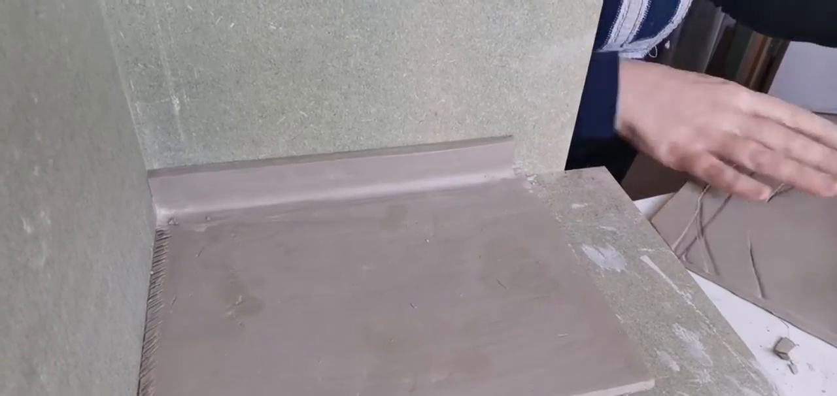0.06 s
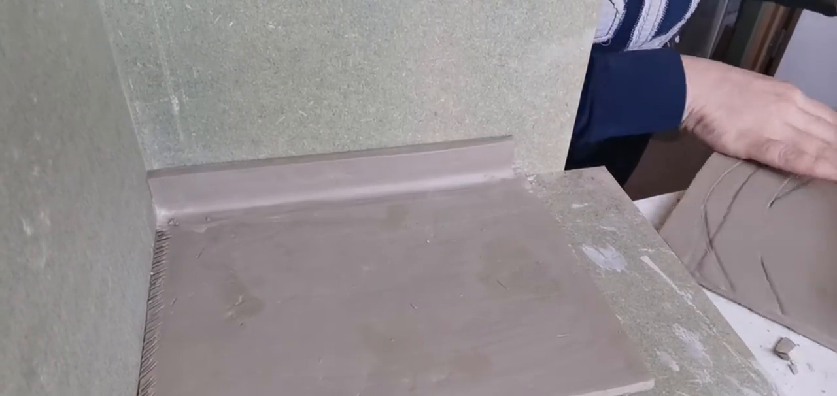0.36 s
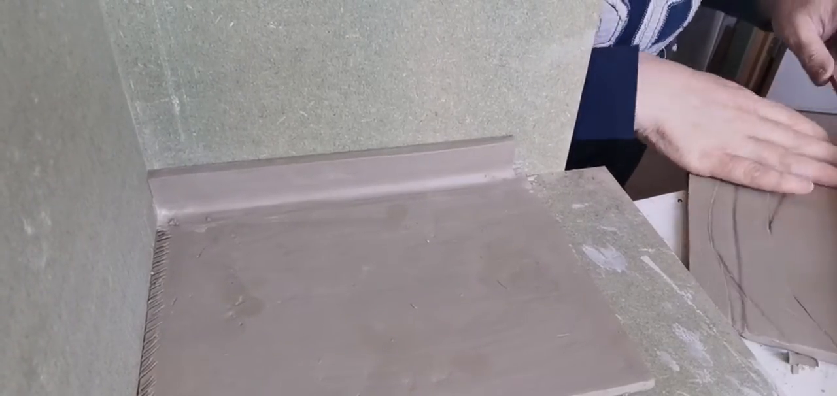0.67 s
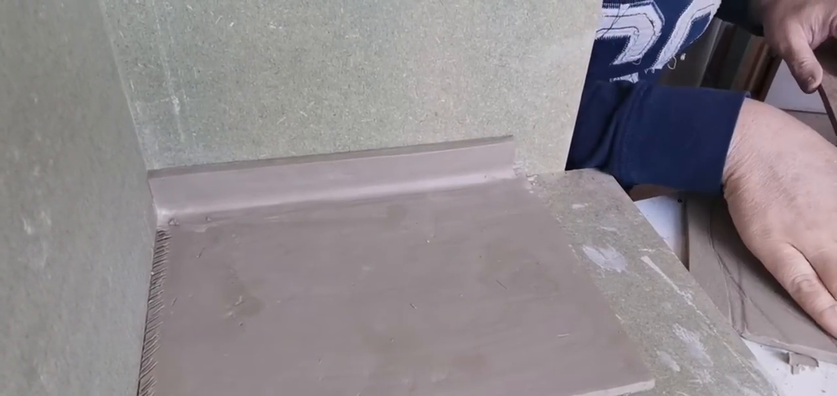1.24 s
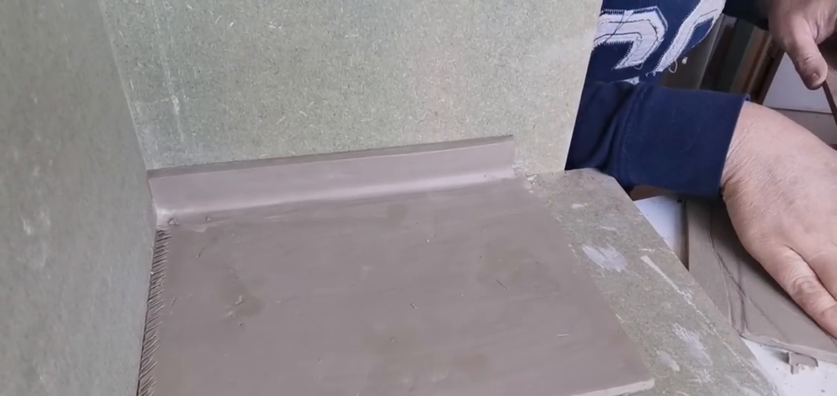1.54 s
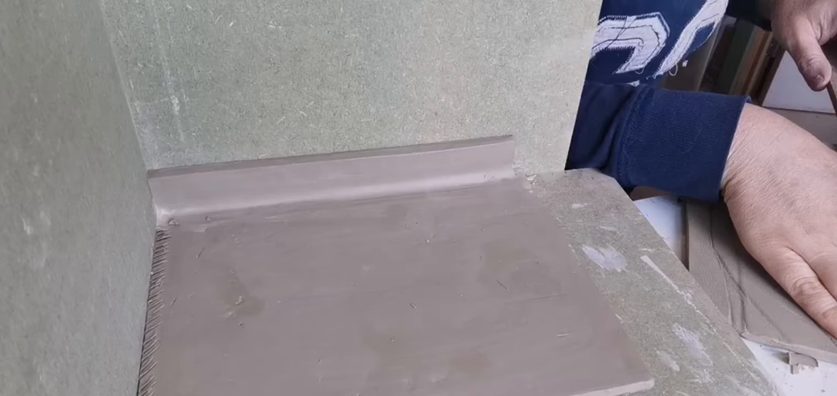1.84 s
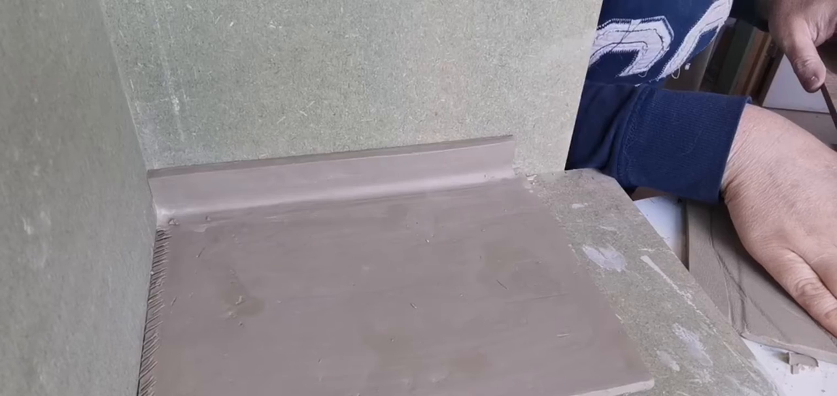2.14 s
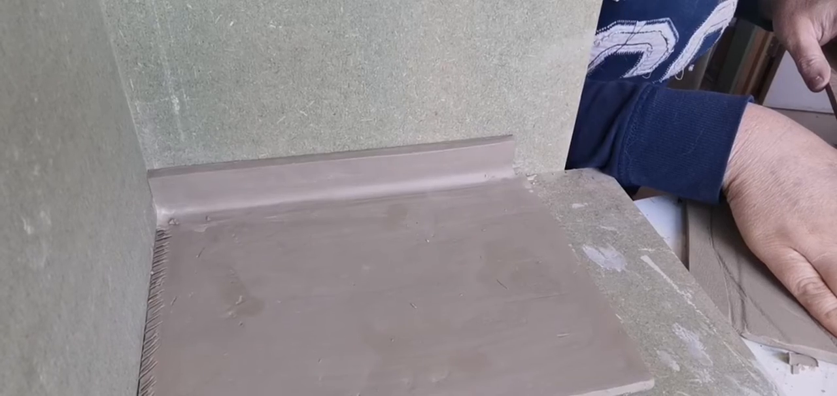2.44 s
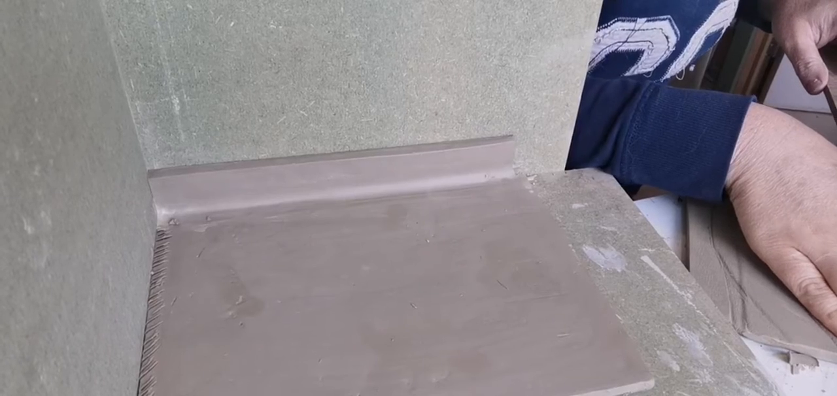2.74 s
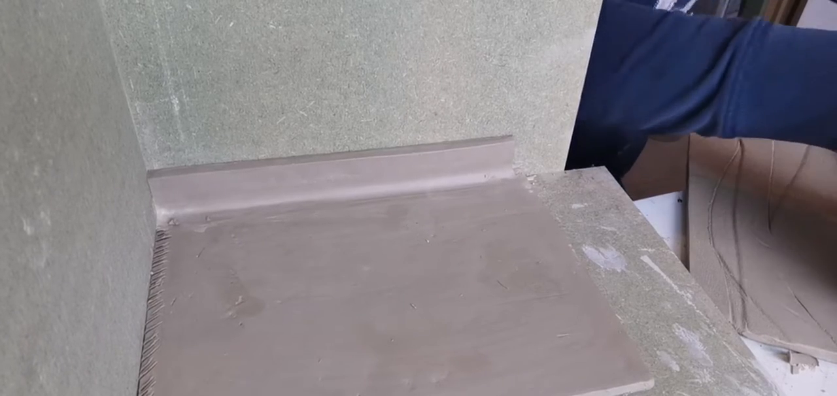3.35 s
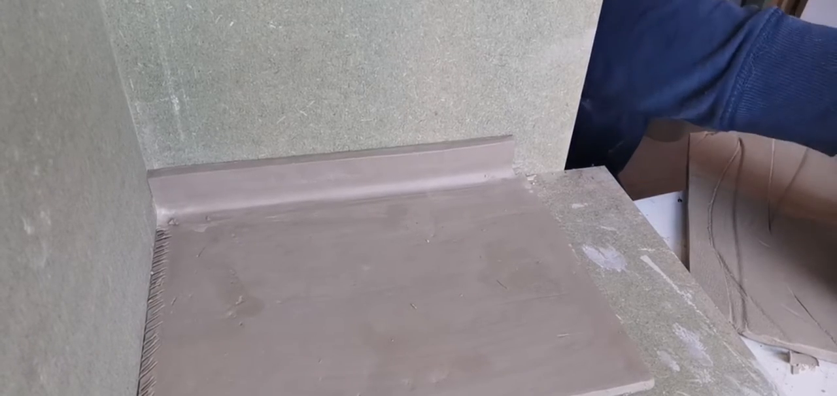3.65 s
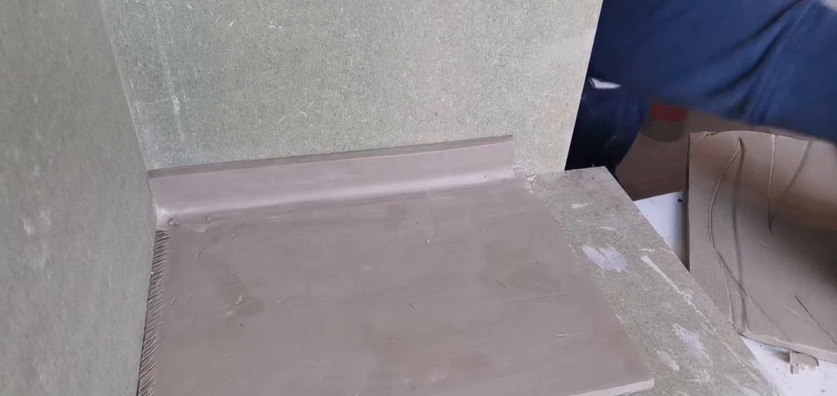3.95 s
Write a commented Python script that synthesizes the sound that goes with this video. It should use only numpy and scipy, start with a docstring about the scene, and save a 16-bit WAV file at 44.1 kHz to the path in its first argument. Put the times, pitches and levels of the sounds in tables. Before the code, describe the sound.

A hand rubs and shifts a clay slab, with soft knocks on a work board.

```python
"""A quiet workroom, where hands shift a clay slab about on a work board.
Impacts of the slab excite the board's modes; sliding friction makes the scuffs and the hiss of a palm
sweeping the clay. Something drags faintly in the lull, then a sleeve rustles, and things are put down
with a thud, a gritty click and a short scrape, all over the low rumble and hiss of the room."""
import sys
import numpy as np
from scipy import signal
from scipy.fft import rfft, irfft
from scipy.io import wavfile
from scipy.ndimage import uniform_filter1d

SR = 44100
rng = np.random.default_rng(int(sys.argv[2]) if len(sys.argv) > 2 else 0)


def materialize(psi):
    """Save the field psi as 16-bit PCM at rate SR to the path in sys.argv[1].

    A 1-D psi becomes a single channel; in a 2-D psi each row is a channel.
    """
    bounded = np.clip(np.atleast_2d(psi).T, -1, 1)
    quanta = np.round(bounded * 32767).astype(np.int16)
    wavfile.write(sys.argv[1], SR, quanta)


N = 176400
T = np.arange(N) / SR

# Rumble and hiss of the room. Each row: frequency in Hz, relative level in dB.
ROOM_SPECTRUM = [(12, -45), (20, 6.5), (38, 0), (81, -8.5), (113, -2.5), (215, -15.5), (335, -17.5),
                 (554, -22), (797, -23.5), (1080, -25.5), (1320, -26.5), (2960, -30.5), (3310, -34),
                 (4630, -28), (5950, -35), (8090, -34.5), (9830, -43), (13700, -35.5), (15800, -33.5)]
# Likeness of the two ears' signals. Each row: frequency in Hz, correlation.
COHERENCE = [(30, 0.21), (130, 0.89), (300, 0.62), (640, 0.12), (1400, -0.16), (4000, -0.023),
             (15000, 0.02)]
# Dull drags over the board. Each row: peak time in seconds, level in dB, rise and fall time constants
# in seconds, centre frequency and bandwidth in Hz.
DRAG_STROKES = [(.03, -38, 0.071, 0.11, 29.6, 30), (.008, -37, 0.043, 0.017, 106, 84),
                (.3, -57, 0.43, 0.37, 264, 137), (.75, -50, 0.13, 0.036, 142, 65),
                (.85, -52.5, 0.27, 0.069, 28.2, 21), (1.235, -48, 0.023, 0.1, 52.6, 100),
                (1.407, -43.5, 0.021, 0.021, 165, 35), (2.15, -62, 0.24, 0.45, 338, 54),
                (3.241, -52, 0.06, 0.18, 133, 85), (3.349, -49.5, 0.053, 0.046, 366, 250),
                (3.78, -44.5, 0.1, 0.15, 150, 167)]

# Envelopes of the sleeve and of the palm's low rub and top sheen.
# Each row: time in seconds, relative level in dB.
SLEEVE_ENVELOPE = [(2.75, -82), (2.768, -96), (2.78, -69), (2.912, -56.5), (2.982, -56), (3.06, -63),
                   (3.16, -49.5), (3.354, -50.5), (3.38, -56), (3.504, -55), (3.56, -65)]
RUB_ENVELOPE = [(0.38, -73), (0.398, -65.5), (0.482, -56), (0.674, -69), (0.762, -62.5), (0.786, -51),
                (0.872, -57.5), (0.928, -51.5), (1.05, -92)]
SHEEN_ENVELOPE = [(0.23, -69), (0.252, -62.5), (0.386, -65.5), (0.48, -50.5), (0.7, -67), (0.744, -66),
                  (0.798, -44.5), (0.9, -46.5), (0.932, -40.5), (1.034, -76), (1.108, -82), (1.192, -67),
                  (1.3, -82)]
# The palm's main hiss. Each row: time in seconds, relative level in dB, relative leftward balance in dB.
PALM_PATH = [(0.2, -59.5, -4), (0.246, -59, -4), (0.255, -48.5, -6), (0.296, -57, -2.5), (0.332, -53, -10),
             (0.372, -59, -8.5), (0.472, -40.5, -2), (0.668, -56.5, -2), (0.759, -54.5, -6.5),
             (0.785, -33.5, -5), (0.81, -33, -0.5), (0.845, -38, 0), (0.885, -39, -0.5), (0.926, -31, 1),
             (1.056, -70.5, 1), (1.1, -71, -2.0)]
# Spectra of the friction noises and the grit's crack. Each row: frequency in Hz, relative level in dB.
SLEEVE_SPECTRUM = [(290, -18), (500, -7.5), (586, -39), (630, -11.5), (931, -6.5), (1060, -9.5),
                   (1630, -16.5), (3040, -7), (3570, -13), (4900, 1.5), (5500, -9), (8130, -2.5),
                   (11500, -15.5), (13100, -8.5), (15800, -16.5)]
RUB_SPECTRUM = [(350, -36), (700, -16), (1150, -5.5), (1450, -10.5), (1800, -8), (2400, -7), (2900, -1),
                (3600, -31), (5000, -46)]
PALM_SPECTRUM = [(2200, -28.5), (3200, -6.5), (3700, -3.5), (4200, -1.5), (4900, 4), (5900, -7.5),
                 (7000, -2), (7900, 2), (9200, -6), (10500, -31), (13000, -40)]
SHEEN_SPECTRUM = [(7500, -26), (9800, 1.5), (11000, -2.5), (12200, -2), (13300, 3), (14500, -1.5),
                  (16000, -3)]
SCUFF_SPECTRUM = [(200, -1.5), (700, 3.5), (1100, -6), (1800, -2.5), (2500, -2), (3500, -3), (5000, -2),
                  (6200, -1), (8200, 2), (11000, -8), (13500, -6.5), (16000, -15)]
CRACK_SPECTRUM = [(1000, -20), (2800, 1), (4500, 5), (6000, 4.5), (8200, 4.5), (10500, -10.5), (13500, -15),
                  (16000, -9)]
# Balance of palm and sleeve, then of scuffs and cracks. Each row: frequency in Hz, left over right in dB.
ARM_BALANCE = [(1000, 6.5), (3600, -3.5), (4900, -7), (5900, 3), (7900, -6.5), (9300, -0.5), (10800, 27),
               (13300, 1), (16000, 21)]
SLAB_BALANCE = [(1000, 2.5), (3600, -1.5), (4900, -10), (5900, -1), (8000, -8), (9300, 3), (10800, 13),
                (13300, 1.5), (16000, 22)]

# Skids of the slab, plus two rows at 0.81 s and 0.927 s that give the palm's sweep extra bite and grit. # Each
# row: peak time in seconds, level in dB, rise and fall time constants in seconds, # relative rasp level in dB,
# rasp frequency and bandwidth in Hz, rasp's left over right in dB.
SKIDS = [(0.069, -51, 0.011, 0.0092, 6.5, 4730, 260, -13), (0.107, -51, 0.0067, 0.014, 16, 4590, 335, -18),
         (0.156, -45, 0.035, 0.014, 4, 4870, 340, -15), (0.175, -62.5, 0.011, 0.0066, 11, 3060, 200, 11),
         (.81, -54.5, 0.011, 0.017, 21, 7200, 1500, -5), (.927, -59, 0.025, 0.023, 14.5, 2070, 610, 1),
         (1.173, -62, 0.013, 0.011, -7, 7800, 900, 3), (1.207, -59.5, 0.021, 0.043, 3.5, 4710, 500, -9),
         (2.31, -64.5, 0.017, 0.018, -4.5, 4700, 440, -2), (3.66, -41, 0.01, 0.011, -5.5, 2760, 900, -2),
         (3.71, -42, 0.012, 0.0094, 0, 4820, 750, -9), (3.768, -36.5, 0.014, 0.012, -9.5, 4460, 1000, -5),
         (3.837, -42, 0.0059, 0.021, 6, 4500, 440, -9), (3.856, -48.5, 0.022, 0.018, 4.5, 2520, 440, 1),
         (3.859, -37.5, 0.011, 0.016, 0.5, 4890, 400, -4), (3.931, -49, 0.064, 0.063, -9, 4930, 440, -1)]
# Grit catching and snapping. Each row: start in seconds, relative level in dB, share of ring in dB.
GRIT_SNAPS = [(0.1167, -28, 3), (0.140, -27.5, -0.5), (.163, -35, -6), (.2525, -38, -5), (0.833, -35, 4),
              (1.2321, -34.5, -13), (3.605, -24, -28), (3.613, -22.5, -32), (3.661, -27.5, -13),
              (3.706, -27, -10), (3.748, -34, -15), (3.7573, -17.5, -3.5), (3.767, -32, -17)]
# A brief high ring near 4.8 and 8 kHz colouring each click, mostly in the right ear.
# Each row: frequency in Hz, relative level in dB, T60 in seconds.
CLICK_RING = [(4300, -8, 0.012), (4790, -0.5, 0.019), (4900, -5.5, 0.017), (7940, -5, 0.0092)]
# Modes of the board. Each row: frequency in Hz, relative level in dB, T60 in seconds.
BOARD_MODES = [(99, -15.5, 0.13), (163.8, -11, 0.23), (248.4, -13, 0.14), (292, -11, 0.08),
               (312.5, -4.5, 0.11), (380, -23, 0.072), (614, -13, 0.065), (667, -8.5, 0.058),
               (784, -11, 0.095), (878, -12.5, 0.14), (1314, -7, 0.057), (2030, -12, 0.034)]
# Impacts on the board. Each row: start in seconds, level in dB, contact pitch in Hz, its T60 in seconds,
# low-pass cutoff of the force in Hz, share of board ring in dB, share of wet slap in dB.
IMPACTS = [(.017, -36, 1160, 0.0083, 1480, -1, -27), (.0295, -28.5, 810, 0.03, 1010, -16, -15.5),
           (0.056, -27.5, 260.7, 0.17, 835, -6.5, -29), (0.0665, -25.5, 820, 0.044, 845, -4.5, -21),
           (.1148, -16.5, 265, 0.043, 1480, -10.5, -12.5), (.1175, -22, 789, 0.087, 1440, -7.5, -23.5),
           (.129, -22.5, 643, 0.048, 1320, -9, -9.5), (.141, -37.5, 246, 0.084, 1400, -2.5, -16),
           (0.4007, -27.5, 390, 0.048, 1180, 0.5, -9), (.432, -26.5, 420, 0.012, 700, -14, -30),
           (.783, -25, 165, 0.12, 1520, -7, -9.5), (1.188, -28.5, 422, 0.071, 1500, -31, -13.5),
           (1.1925, -18, 458, 0.017, 1110, -19, -24), (1.2, -35, 710, 0.015, 1600, -4.5, -6.5),
           (1.3794, -22, 323, 0.0095, 507, -19.5, -49), (3.605, -19, 210, 0.015, 890, -16, -12.5),
           (3.6132, -9.5, 288, 0.026, 930, -17, -24.5), (3.6155, -16, 632, 0.021, 910, -28, -53),
           (3.617, -21.5, 156, 0.064, 500, -21, -15.5), (3.667, -29, 169, 0.093, 600, -7, -11.5),
           (3.706, -25.5, 357, 0.036, 900, -6, -12.5), (3.7095, -25, 755, 0.023, 1100, -18, -15),
           (3.721, -30, 145, 0.096, 400, -12, -30), (3.7571, -26, 146, 0.098, 1980, -3, -12),
           (3.769, -22.5, 372, 0.034, 1490, -19, -33)]


def from_db(db):
    """Amplitude ratio for a level in decibels."""
    return 10 ** (np.asarray(db) / 20)


def unit_rms(x):
    """Normalise so that the mean of the two channels has rms 1."""
    return x / np.sqrt(np.mean(x.mean(axis=0) ** 2) + 1e-20)


def pan(db):
    """Constant-power gains for a level difference of left over right."""
    gains = from_db(np.array([np.atleast_1d(db), -np.atleast_1d(db)]) / 2)
    return gains / np.sqrt(np.mean(gains ** 2, axis=0))


def at_hz(points, hz):
    """Interpolate a table on a log-frequency axis."""
    f, value = np.transpose(points)
    return np.interp(np.log(hz + 1), np.log(f), value)


def envelope(curve, fade_s=0.26):
    """Gain along a dB curve, decaying exponentially beyond its ends."""
    s, db = np.transpose(curve)
    outside = np.abs(T - np.clip(T, s[0], s[-1]))
    return from_db(np.interp(T, s, db)) * np.exp(-outside / fade_s)


def swell(peak_s, rise_s, fall_s):
    """Exponential growth to a peak and decay from it."""
    return np.exp(np.maximum(np.minimum((T - peak_s) / rise_s, (peak_s - T) / fall_s), -30))


def add(out, s, sound):
    """Superpose a sound starting at s seconds."""
    i = max(int(s * SR), 0)
    out[..., i:i + sound.shape[-1]] += sound[..., :N - i]


def butterworth(x, hz, kind, order=2):
    """Filter with a maximally flat passband."""
    return signal.sosfilt(signal.butter(order, hz, kind, fs=SR, output="sos"), x)


def colour(x, spectrum, balance=None):
    """Spectral shaping of two noises, mixed as mid and side to set their coherence."""
    hz = np.arange(N // 2 + 1) * SR / N
    mid, side = rfft(x) * from_db(at_hz(spectrum, hz))
    alike = at_hz(COHERENCE, hz)
    ears = np.sqrt(1 + alike) * mid + np.sqrt(1 - alike) * side * [[1], [-1]]
    return unit_rms(irfft(ears * (pan(at_hz(balance, hz)) if balance else 1), N))


def resonance(x, hz, width_hz):
    """A two-pole resonator passes a band around its natural frequency."""
    r = np.exp(-np.pi * width_hz / SR)
    return signal.lfilter([1, 0, -1], [1, -2 * r * np.cos(2 * np.pi * hz / SR), r * r], x)


def ring(x, hz, t60):
    """Damped oscillator: a unit impulse starts a decaying sine of height 1."""
    r, w = np.exp(-np.log(1000) / (t60 * SR)), 2 * np.pi * hz / SR
    return signal.lfilter([0, np.sin(w)], [1, -2 * r * np.cos(w), r * r], x + 1e-18)


def room_tone():
    """Ambient noise: a steady rumble with faint hiss."""
    return from_db(-55) * colour(rng.standard_normal((2, N)), ROOM_SPECTRUM)


def reverberation(x, t60=0.14, build_s=0.0067):
    """The small room's diffuse field builds up and decays exponentially, alike at both ears in the bass."""
    tail = colour(rng.standard_normal((2, N)), spectrum=[(20, 0), (20000, 0)])
    tail *= np.exp(-np.log(1000) * T / t60) * (1 - np.exp(-T / build_s))
    tail /= np.sqrt(np.sum(tail ** 2) / 2)
    return from_db(-10.5) * signal.fftconvolve(x[None], tail[:, :SR], axes=1)[:, :N]


def near_echoes(x, echo_db=-4.5, decay_s=0.0091, change_s=0.243):
    """Interference: reflections off nearby boards ripple each ear's spectrum, shifting as hands move."""
    t, out = T[:SR // 25], x.copy()
    for centre in np.arange(0, T[-1] + change_s, change_s):
        echoes = rng.standard_normal((2, len(t))) * np.exp(-t / decay_s)
        echoes *= from_db(echo_db) / np.sqrt(np.sum(echoes ** 2) / 2)
        near = np.abs(T - centre) < change_s
        if near.any():
            crossfade = np.cos(np.pi / 2 * (T[near] - centre) / change_s)
            add(out, T[near][0], signal.fftconvolve(x[:, near] * crossfade, echoes, axes=1))
    return out


def friction(spread_db, smooth, slips_per_s=7000):
    """Stick-slip friction: tiny random slips of uneven size on a bed of smooth hiss."""
    slipping = rng.random(N) < slips_per_s / SR
    sizes = from_db(spread_db * np.minimum(rng.exponential(1, N), 5))
    grains = unit_rms(slipping * sizes * rng.standard_normal((2, N)))
    return near_echoes(grains + smooth * rng.standard_normal((2, N)))


def drags():
    """Forced vibration: slow pushes make the board murmur in low bands of noise."""
    noise = colour(rng.standard_normal((2, N)), spectrum=[(20, 10.0), (600, 2), (3000, 17.4)])
    out = 0
    for s, db, rise, fall, hz, width in DRAG_STROKES:
        murmur = unit_rms(resonance(resonance(noise, hz, width), hz, 2 * width))
        out += from_db(db) * swell(s, rise, fall) * murmur
    return out


def sleeve():
    """Friction of cloth gives a soft rustle as the arm is lifted."""
    rustle = colour(friction(spread_db=1.0, smooth=0.98), SLEEVE_SPECTRUM, ARM_BALANCE)
    return from_db(0.5) * envelope(SLEEVE_ENVELOPE) * rustle


def palm():
    """Sliding friction of skin on clay: grainy hiss between a lower rub and a fine sheen."""
    hiss = colour(friction(spread_db=1.5, smooth=0.9), PALM_SPECTRUM, ARM_BALANCE)
    sheen = colour(friction(spread_db=1.0, smooth=0.9), SHEEN_SPECTRUM, ARM_BALANCE)
    rub = colour(friction(spread_db=2.0, smooth=1.0), RUB_SPECTRUM)
    path = np.array(PALM_PATH)
    left_db = np.interp(T, path[:, 0], path[:, 2]) + 3.5
    return (envelope(path[:, :2]) * pan(left_db) * hiss
            + from_db(2) * envelope(SHEEN_ENVELOPE) * sheen
            + from_db(5) * envelope(RUB_ENVELOPE) * rub)


def scuffs(hiss_pan_share=0.34):
    """Stick-slip of the skidding slab, and of the palm at two moments of its sweep: broad hiss and a resonant
    rasp, near a squeak when narrow."""
    hiss = colour(friction(spread_db=1.5, smooth=0.84), SCUFF_SPECTRUM, SLAB_BALANCE)
    slips = friction(spread_db=1.5, smooth=0.34)
    out = 0
    for s, db, rise, fall, rasp_db, hz, width, left_db in SKIDS:
        rasp = resonance(resonance(slips, hz, width), hz, width)
        rasp /= np.sqrt(uniform_filter1d(rasp ** 2, SR // 40) + 1e-12)   # steady pressure keeps it even
        skid = pan(left_db * hiss_pan_share) * hiss + from_db(rasp_db + 3.5) * pan(left_db) * rasp
        out += from_db(db) * swell(s, rise, fall) * skid
    return out


def snaps(crack_s=0.002):
    """Impulsive release: grit lets go with a dry crack. A brief high ring colours each click."""
    rings, bursts, click = np.zeros(N), np.zeros(N), signal.unit_impulse(SR // 10)
    for s, db, ring_db in GRIT_SNAPS:
        add(bursts, s, from_db(db) * np.exp(-T[:len(click)] / crack_s))
        tones = sum(from_db(tone_db) * ring(click, hz, t60) for hz, tone_db, t60 in CLICK_RING)
        add(rings, s, from_db(db + ring_db) * tones)
    cracks = from_db(-13.5) * bursts * colour(rng.standard_normal((2, N)), CRACK_SPECTRUM, SLAB_BALANCE)
    direct = rings * pan(-26) + cracks
    return direct + from_db(10.5) * reverberation(direct.mean(axis=0))


def bumps(slap_band_hz=(463, 1850), slap_s=0.0023, left_lag_s=0.00027):
    """Modal excitation: a soft impact's low-passed force thuds and rings the board, with a wet slap."""
    knocks, slaps, click = np.zeros(N), np.zeros((2, N)), signal.unit_impulse(SR // 2)
    for s, db, hz, t60, cutoff_hz, board_db, slap_db in IMPACTS:
        force = butterworth(click + 1e-18, cutoff_hz, "low")
        # modes alternate in sign, and their strengths vary from blow to blow
        board = sum((-1) ** k * from_db(mode_db + 2 * rng.standard_normal()) * ring(force, f, decay)
                    for k, (f, mode_db, decay) in enumerate(BOARD_MODES))
        thud = butterworth(ring(force, hz, t60), hz / 2, "high")
        add(knocks, s, from_db(db) * (thud + from_db(board_db) * board))
        noise = unit_rms(butterworth(rng.standard_normal((2, len(click))), slap_band_hz, "band", order=3))
        add(slaps, s, from_db(db + slap_db) * noise * np.exp(-T[:len(click)] / slap_s))
    knocks = butterworth(knocks, 90, "high")
    direct = np.array([np.interp(T - left_lag_s, T, knocks), knocks]) * pan(1.0)
    return direct + slaps + reverberation(knocks + from_db(7) * slaps[0])


def scene():
    """Superposition of the room tone and all the handling."""
    return room_tone() + bumps() + snaps() + scuffs() + palm() + sleeve() + drags()


def record(dry):
    """An elliptic low-pass cuts steeply above 15.9 kHz."""
    return signal.sosfilt(signal.ellip(12, .1, 80, 15900, fs=SR, output="sos"), dry)


dry = scene()
out = record(dry)
materialize(out)
```